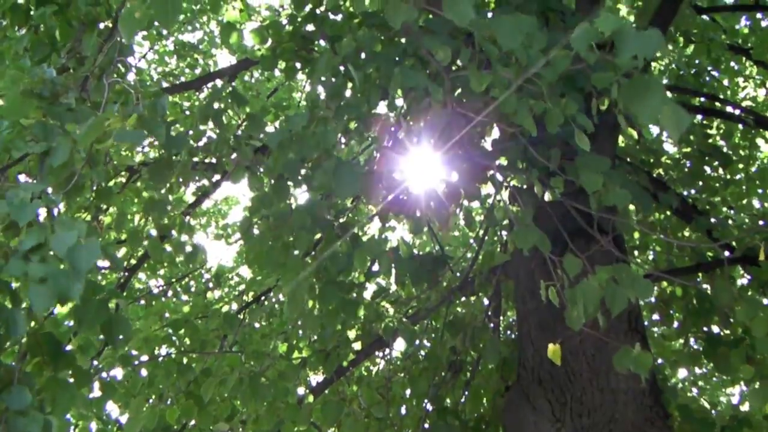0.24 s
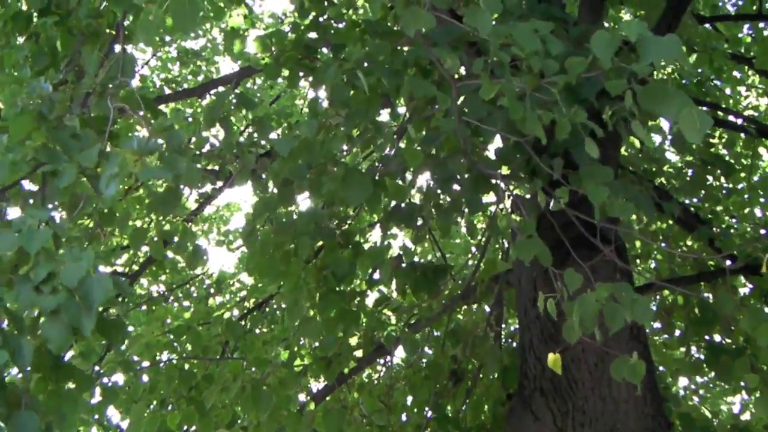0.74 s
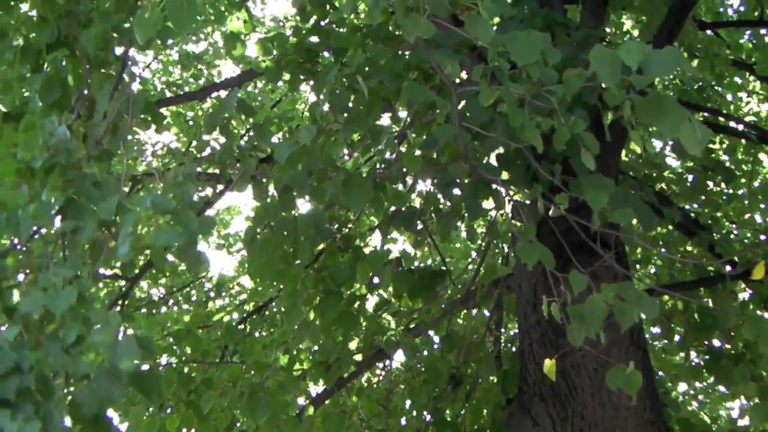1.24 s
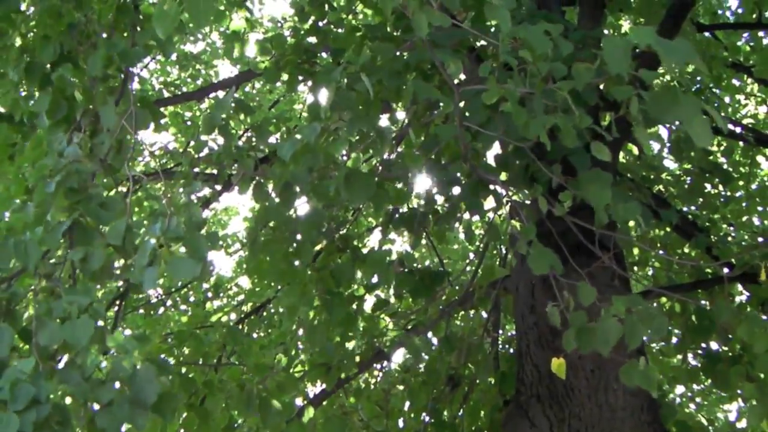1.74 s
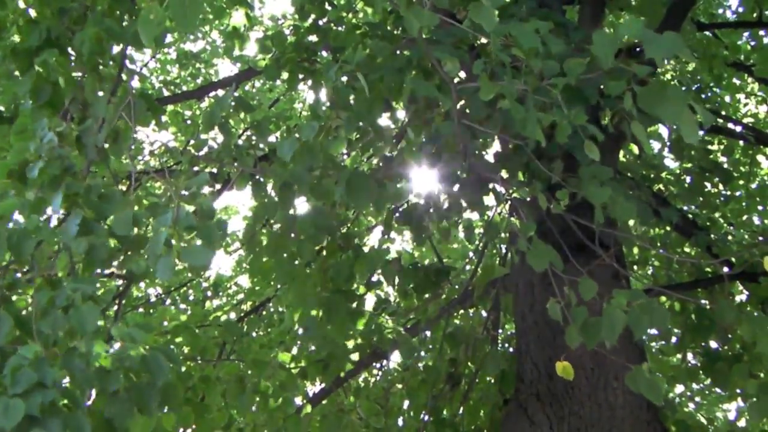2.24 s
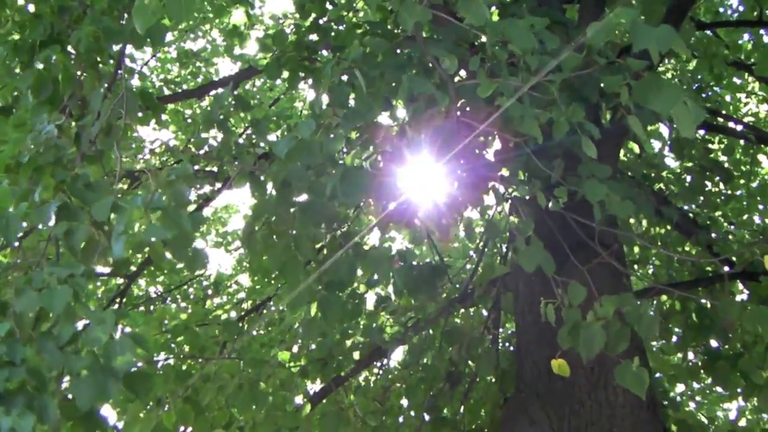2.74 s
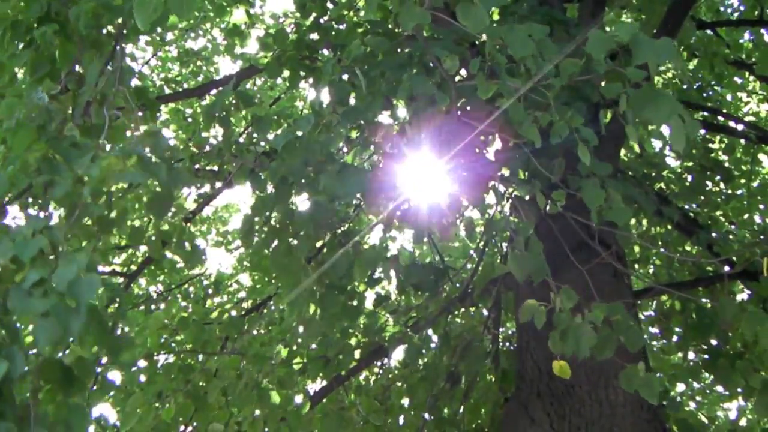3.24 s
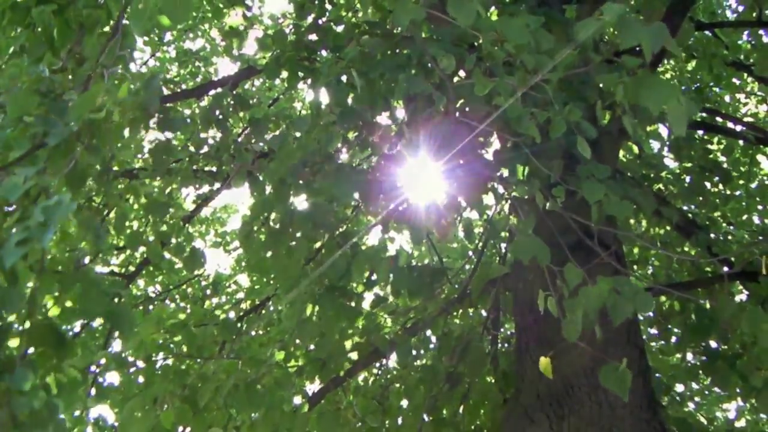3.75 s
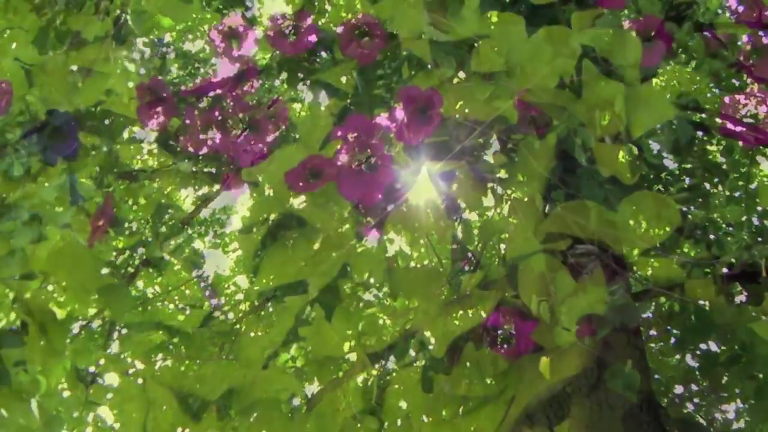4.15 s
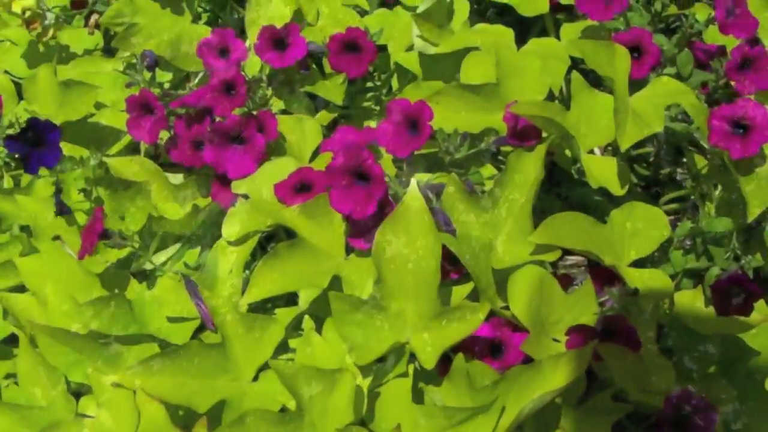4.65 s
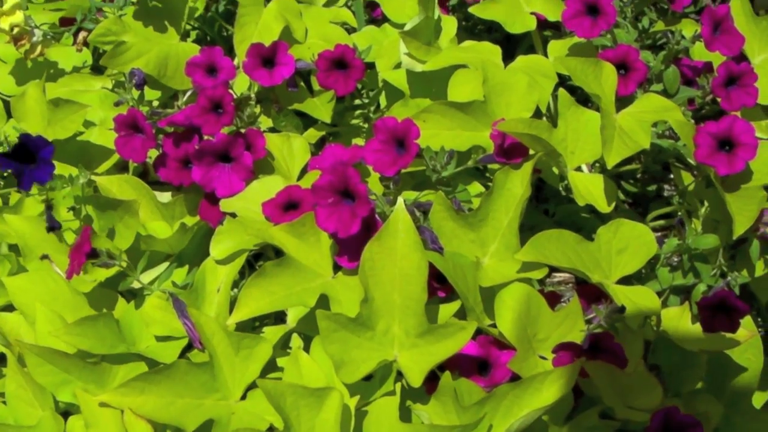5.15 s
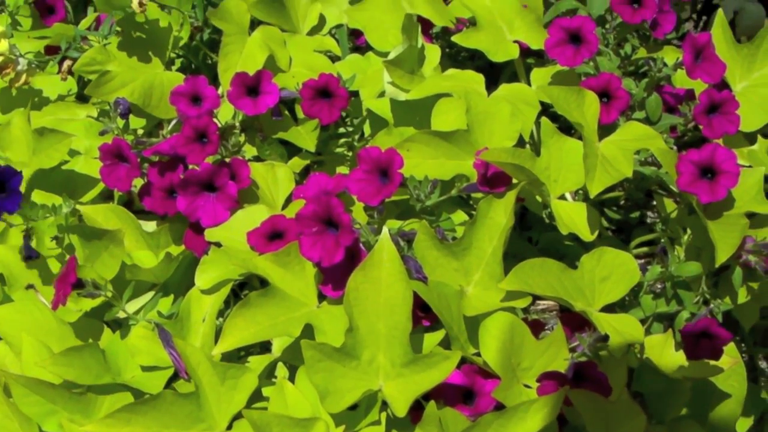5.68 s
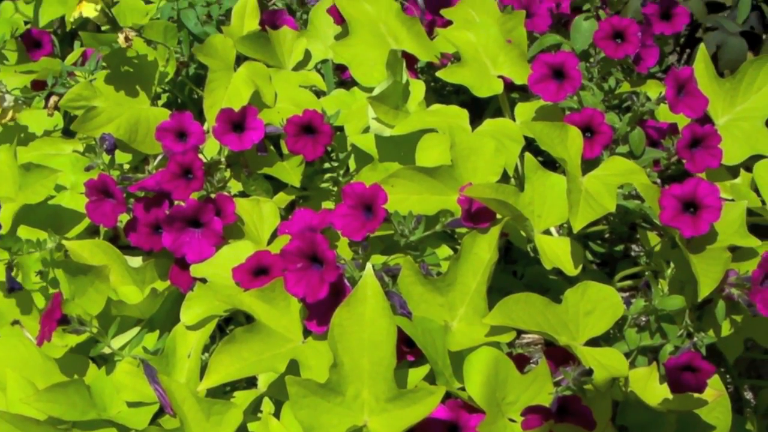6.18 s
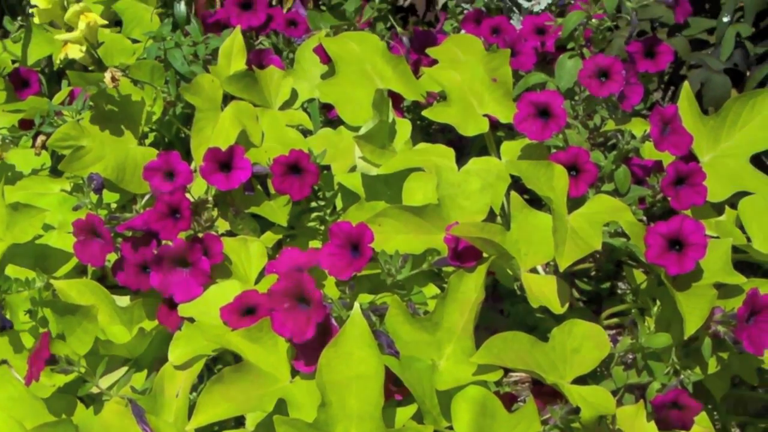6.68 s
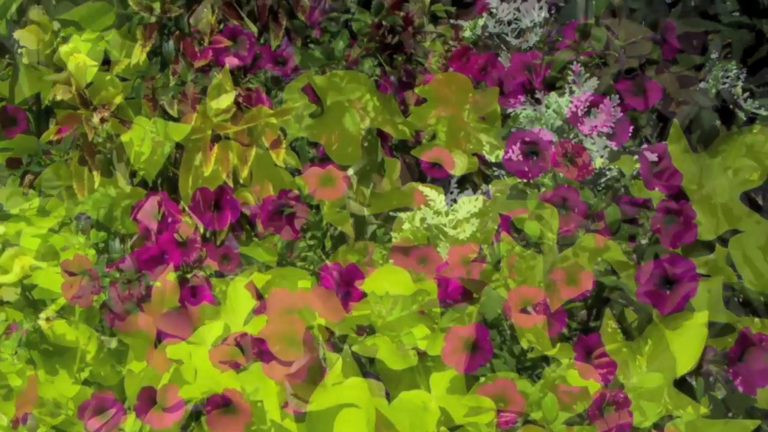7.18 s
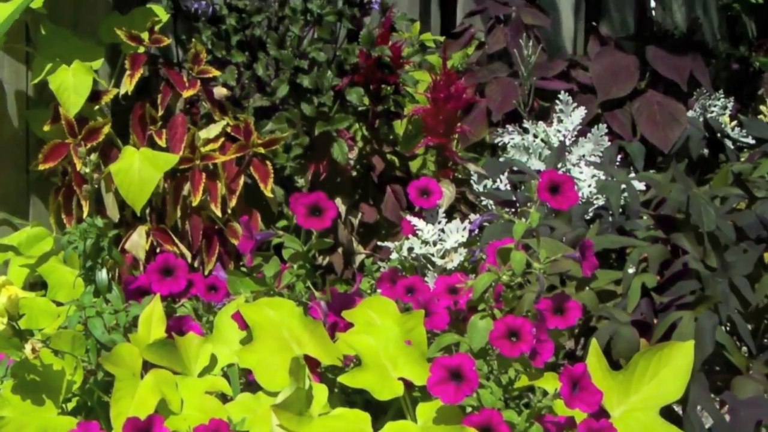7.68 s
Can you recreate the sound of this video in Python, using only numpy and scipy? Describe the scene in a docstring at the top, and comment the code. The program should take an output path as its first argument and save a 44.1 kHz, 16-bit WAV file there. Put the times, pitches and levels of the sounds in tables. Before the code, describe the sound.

A cicada sings a loud, harsh, rapidly pulsing buzz from a leafy tree, over faint distant traffic, with a bird twittering early on.

```python
"""Up in a leafy tree a cicada sings: about ten bursts a second, most of them a dozen pulls of its two tymbals
in turn. Every pull buckles four ribs, which click and set the tymbal ringing over its air sac.
The canopy answers with echoes and a short scattered tail, for the cicada and for a twittering bird.
Underneath lie a farther cicada (throbbing noise), distant traffic, rustling leaves and puffs of wind on
the microphone (coloured noise), and a faint hum (three wavering tones)."""
import sys
import numpy as np
from scipy import signal
from scipy.fft import rfft, irfft, next_fast_len
from scipy.io import wavfile
from scipy.ndimage import map_coordinates

SR = 44100
rng = np.random.default_rng(int(sys.argv[2]) if len(sys.argv) > 2 else 0)


def to_linear_factor(level_db):
    """Convert decibel levels (scalar or array-like) to linear amplitude factors."""
    exponent = np.asarray(level_db, float) / 20
    return 10 ** exponent


def wrap_up_sound(samples):
    """Save the sound to the file named by the first command line argument, as 16-bit audio."""
    columns = np.atleast_2d(samples).T
    # keep every value between -1 and 1, then stretch to whole-number steps
    tamed = np.clip(columns, -1, 1)
    steps = np.round(tamed * 32767).astype(np.int16)
    wavfile.write(sys.argv[1], SR, steps)


N = 349272  # length in samples


def unit(x):
    """Scales a sound to an rms of 1."""
    return x / np.sqrt(np.mean(x ** 2) + 1e-20)


def along(points, hz):
    """Reads (Hz, value) points at any frequency, along a log frequency axis."""
    f, v = np.transpose(points)
    return np.interp(np.log(hz + 1), np.log(f + 1), v)


def curves(rows):
    """Draws one value per sample for each column after the time."""
    s, *cols = np.transpose(rows)
    return [np.interp(np.arange(N) / SR, s, c) for c in cols]


def wobble(rate):
    """A smooth random curve with rate random points a second."""
    knots = rng.standard_normal(int(N * rate / SR) + 4)
    return map_coordinates(knots, [np.arange(N) * rate / SR])


def filtered(x, response):
    """Multiplies the spectrum of x by a response, which may be complex."""
    m = next_fast_len(x.shape[-1] + SR // 2)
    spectrum = rfft(x, m) * response(np.fft.rfftfreq(m, 1 / SR))
    return irfft(spectrum, m)[..., :x.shape[-1]]


def coloured(points, channels=1):
    """Noise of rms 1 whose spectrum follows (Hz, dB) points."""
    noise = rng.standard_normal((channels, N))
    return unit(filtered(noise, lambda hz: to_linear_factor(along(points, hz))))


def causal(points, size=1024):
    """A short sound with a given spectrum and its energy as early as possible (minimum phase)."""
    cepstrum = irfft(np.log(to_linear_factor(along(points, np.fft.rfftfreq(size, 1 / SR)))), size)
    # folding the second half onto the first leaves nothing before time zero
    cepstrum = cepstrum * np.r_[1, np.full(size // 2 - 1, 2), 1, np.zeros(size // 2 - 1)]
    return irfft(np.exp(rfft(cepstrum)), size)


def impulses(s, size, lead):
    """Band-limited impulses at times s, between samples if need be; the array starts lead samples early."""
    at = s * SR + lead
    taps = np.floor(at)[:, None] + np.arange(-7, 9)
    offset = taps - at[:, None]
    kernel = np.sinc(offset) * np.cos(offset * np.pi / 16) ** 2
    heights = (kernel * size[:, None]).ravel()
    return np.bincount(taps.astype(int).ravel(), heights, N + 2 * lead)[:N + lead]


def hum():
    """A low machine note that comes and goes: three tones locked to one slightly wavering pitch."""
    # loudness of the hum [t/s, level/dB]
    hum_level = [(0, -66), (1, -68.5), (2.8, -73), (3.6, -84), (4.4, -61.5), (4.6, -68), (5.2, -65),
                 (5.47, -53), (6.5, -59.5), (6.75, -64), (7.92, -55.5)]
    # its tones [multiple of the pitch, level/dB on top of the loudness]
    hum_tones = [(.5, 4.5), (1, 1), (3, -5.5)]
    pitch_hz, waver_hz = 226.5, 3.02
    turn = 2 * np.pi * np.cumsum(pitch_hz + waver_hz * wobble(2.5)) / SR
    strength_db = curves(hum_level)[0]
    return sum(to_linear_factor(strength_db + db + 1.0 * wobble(8.2)) * np.sin(k * turn) for k, db in hum_tones)


def traffic():
    """Distant traffic: a broad rumble of noise, nearly alike left and right."""
    # loudness of the traffic [t/s, level/dB before the lift below]
    traffic_level = [(0, -50.5), (3.4, -53), (4.3, -54.5), (4.75, -54), (4.82, -51), (6, -51.5),
                     (6.45, -49.5), (6.7, -50.5), (7.1, -51.5), (7.92, -49)]
    # its colour [f/Hz, relative level/dB]
    traffic_colour = [(20, -20), (60, 7), (110, 8.5), (200, -0.5), (280, -2), (400, 8), (600, -1),
                      (1000, 1.5), (1400, -1), (3000, -0.5), (9000, -6.5), (16000, -60)]
    mid, side = coloured(traffic_colour, channels=2)
    stereo = mid + 0.15 * side * np.array([[1], [-1]])
    return to_linear_factor(curves(traffic_level)[0] + 6.5 + 2.2 * wobble(4.34)) * stereo


def leaves():
    """A faint even rustle: bright noise, spread wider than the insects."""
    # colour of the rustle [f/Hz, relative level/dB]
    rustle_colour = [(2000, -13), (6000, 0), (10000, -11), (13000, -8), (15500, -12), (16000, -40)]
    mid, side = coloured(rustle_colour, channels=2)
    return to_linear_factor(-56.0 + .6 * wobble(2.6)) * (mid + 0.5 * side * np.array([[1], [-1]]))


def wind():
    """Air buffeting the two microphone ports separately: an unsteady breeze with short puffs on top."""
    # breeze [t/s, level/dB before the trim below]
    breeze = [(0, -65), (1.15, -63), (1.5, -68), (2.3, -53), (3.3, -68), (3.7, -60), (4.3, -57), (5.2, -55),
              (5.6, -64), (6.3, -46), (6.8, -64), (7.3, -48), (7.92, -61)]
    # puffs [t/s of the peak, level/dB before the trim, length/s between points 13 dB down]
    puff_list = [(1.983, -53, 0.077), (2.283, -41, 0.07), (2.36, -41, .08), (2.625, -32.5, 0.034),
                 (2.783, -43, .07), (3.134, -46, 0.082), (3.306, -53, 0.11), (3.392, -43.5, 0.19),
                 (4.036, -54, 0.089), (4.5, -50, 0.091), (4.888, -46, 0.098), (5.16, -49, .06),
                 (5.24, -54, 0.04), (5.647, -50, 0.055), (5.734, -40, 0.047), (6.262, -46, .12),
                 (6.373, -46, .06), (6.455, -48, .05), (6.58, -47, .09), (6.904, -45, 0.044),
                 (7.26, -38, 0.19), (7.434, -39, 0.1), (7.655, -38, 0.088)]
    # colour of the buffeting [f/Hz, relative level/dB]
    buffet_colour = [(20, -25), (50, -15), (110, 11), (200, -0.5), (400, -10), (800, -23), (2000, -100)]
    t = np.arange(N) / SR
    puffs = sum(to_linear_factor(db) * np.exp(-(2.44 * (t - s) / length) ** 2) for s, db, length in puff_list)
    strength = to_linear_factor(curves(breeze)[0] + 3.9 * wobble(13)) + puffs
    lumps = to_linear_factor(4.6 * np.array([wobble(15), wobble(21)]))  # one unsteadiness per port
    trim = to_linear_factor(-1.0)
    return trim * strength * unit(lumps * coloured(buffet_colour, channels=2))


def far_cicada():
    """A farther cicada, smeared to a buzz: noise that throbs unevenly."""
    # loudness of the buzz [t/s, level/dB before the lift below]
    far_level = [(0.0, -42.5), (7.92, -46.5)]
    # its colour [f/Hz, relative level/dB]
    far_colour = [(1000, -68), (2500, -15), (3400, 24.5), (4400, 12), (5300, -40), (6300, 15), (7200, -15),
                  (9000, 5), (12000, -49), (16000, -53)]
    throb = to_linear_factor(2.1 * wobble(200) + 0.72 * wobble(15))
    return to_linear_factor(curves(far_level)[0] + 7.5) * unit(throb * coloured(far_colour))


def bird():
    """A far bird's twitter: short sliding whistles with a fast warble in pitch."""
    # whistles [t/s, length/s, start f/Hz, end f/Hz, level/dB before the break-up below]
    whistles = [(.095, .04, 6400, 6200, -40), (.385, .045, 5350, 5250, -38), (.48, .04, 5900, 6700, -42),
                (.575, .025, 5100, 5400, -38), (.595, .025, 6800, 5800, -37), (.77, .04, 5250, 5350, -38),
                (.775, .03, 4600, 4400, -39), (.865, .035, 6500, 6700, -39), (.955, .04, 5700, 4900, -37),
                (1.055, .03, 4700, 4300, -40), (1.155, .04, 4200, 5600, -36),
                (1.245, .045, 5700, 6900, -36), (1.335, .045, 6300, 4900, -36),
                (1.43, .035, 4900, 4200, -38), (1.53, .02, 6500, 6000, -40), (1.555, .02, 5900, 5700, -41)]
    out = np.zeros(N)
    for s, length, start_hz, end_hz, db in whistles:
        u = np.arange(round(length * SR)) / (length * SR)  # 0 to 1 through the note
        warble_hz = 120 * np.sin(2 * np.pi * 130 * u * length)
        hz = start_hz + (end_hz - start_hz) * u + warble_hz
        tone = np.sin(2 * np.pi * np.cumsum(hz) / SR)
        out[round(s * SR):][:len(u)] += to_linear_factor(db) * np.sin(np.pi * u) ** .5 * tone
    return out * to_linear_factor(3 * wobble(150) + 1.5)  # leaves break the notes up


def pulls():
    """The cicada's muscles: time and level of every pull, and whether its tymbal faces away."""
    # bursts of song [t/s, number of pulls, basic first gap/ms, which tymbal leads: +1 or -1]
    bursts = [(-.0716, 13, 5, 1), (.0275, 14, 5.44, -1), (.1273, 13, 5.31, -1), (.2218, 14, 4.72, 1),
              (.3221, 14, 5.03, 1), (.423, 13, 4.77, 1), (.5188, 13, 5.5, -1), (.6152, 13, 4.59, 1),
              (.7105, 13, 5.27, -1), (.8066, 12, 4.91, 1), (.8986, 13, 4.77, 1), (.9951, 13, 5.41, -1),
              (1.0922, 13, 5.1, 1), (1.1888, 13, 5.77, -1), (1.2845, 12, 4.75, 1), (1.3761, 13, 4.73, 1),
              (1.4719, 13, 5.28, 1), (1.569, 13, 4.5, 1), (1.6647, 13, 5.77, -1), (1.761, 14, 5.29, 1),
              (1.8621, 13, 4.93, 1), (1.9605, 14, 5.84, -1), (2.0618, 13, 5.41, -1), (2.1588, 13, 5.16, 1),
              (2.256, 13, 5.84, -1), (2.3529, 13, 5.11, 1), (2.4504, 13, 5.84, -1), (2.5479, 12, 5.66, 1),
              (2.6434, 12, 5.18, 1), (2.7399, 13, 5.75, 1), (2.8367, 12, 5.64, -1), (2.9302, 13, 5.53, -1),
              (3.0282, 14, 5.01, 1), (3.13, 14, 4.87, 1), (3.2318, 12, 4.96, 1), (3.327, 12, 5.72, 1),
              (3.4196, 13, 5.54, 1), (3.5191, 13, 6.01, -1), (3.6185, 13, 5.41, 1), (3.7169, 13, 5.35, -1),
              (3.8164, 13, 5.54, 1), (3.9159, 12, 5.3, -1), (4.0127, 13, 6.21, -1), (4.1116, 13, 5.28, 1),
              (4.2106, 12, 6.22, -1), (4.3052, 12, 5.33, 1), (4.3997, 12, 5.92, -1), (4.497, 12, 6.84, -1),
              (4.5927, 12, 5.9, -1), (4.688, 12, 5.95, -1), (4.7824, 12, 6.17, -1), (4.8779, 12, 5.74, -1),
              (4.9727, 12, 6.37, -1), (5.0675, 12, 5.95, -1), (5.1615, 12, 5.94, -1),
              (5.2578, 12, 6.08, -1), (5.3527, 12, 5.79, -1), (5.447, 12, 6.37, -1), (5.5426, 12, 6.05, -1),
              (5.6376, 12, 5.9, 1), (5.7346, 12, 6.06, -1), (5.832, 12, 6.6, -1), (5.9278, 12, 5.97, -1),
              (6.0243, 11, 5.92, -1), (6.1167, 12, 5.81, 1), (6.2125, 12, 6.03, 1), (6.3099, 12, 5.93, 1),
              (6.405, 12, 6.28, 1), (6.5013, 12, 5.68, 1), (6.5963, 12, 5.79, 1), (6.6909, 12, 6.19, 1),
              (6.7874, 12, 5.48, -1), (6.8848, 11, 6.01, 1), (6.977, 10, 6.11, 1), (7.0651, 11, 6.73, -1),
              (7.1588, 11, 5.75, 1), (7.2516, 11, 6.43, -1), (7.3448, 11, 5.99, 1), (7.4352, 12, 5.91, -1),
              (7.531, 12, 6.98, -1), (7.6256, 11, 7.03, -1), (7.7166, 12, 5.68, 1), (7.8105, 12, 6.18, 1),
              (7.9062, 3, 5.42, 1)]
    # singing effort [t/s, level/dB]
    effort = [(0, -16), (.7, -15), (1.8, -15.5), (3.1, -15), (4.3, -15.5), (5.8, -15.5), (6.2, -16.5),
              (6.6, -15), (7.92, -15.4)]
    # gap between pulls, its growth per second as the muscles tire, unevenness of the two tymbals
    base_gap_ms, tiring_ms_per_s, lag_ms = 4.345, .019, .295
    # first pull, rise through the middle, last pull and its scatter, scatter from burst to burst
    first_db, swell_db, last_db, falter_db, burst_scatter_db = -1.5, 0.03, -2.5, 0.3, 0.45
    times, levels, away = [], [], []
    for s, count, first_ms, leader in bursts:
        k = np.arange(round(count) - 1)
        u = k / k[-1]  # 0 to 1 from the second pull to the last
        chance = rng.standard_normal((16, 3))[:len(k) + 1]
        hurry = 1.34 * u * (1 - u)  # ms; the pulls slow down through the burst
        gap_ms = base_gap_ms + tiring_ms_per_s * s
        later_ms = first_ms + k * gap_ms + leader * lag_ms * (k % 2) - hurry + .025 * chance[1:, 0]
        ms = np.r_[0, later_ms]
        swell = np.r_[first_db, -swell_db * (1 - u[:-1]), last_db + falter_db * chance[1, 2]]
        db = np.interp(s, *np.transpose(effort)) + burst_scatter_db * chance[0, 2]
        away.append(leader * (-1) ** np.arange(len(ms)) > 0)  # the tymbals take turns
        times.append(s + ms / 1000)
        levels.append(db + swell + .5 * chance[:, 1])
    return np.concatenate(times), np.concatenate(levels), np.concatenate(away)


def cicada(lead):
    """Each rib snaps with a bright click and leaves the tymbal ringing; the air sac radiates the ring."""
    # ribs of one pull [mean time after the pull/ms, scatter/ms]
    rib_times = [(0, .035), (.6, .025), (1.09, .008), (1.61, .035)]
    # what each rib gives, before the mix below [click level/dB, ring f/Hz, ring level/dB, ring fade/(dB/ms)]
    rib_sounds = [(4, 3100, -47, 20), (-3.5, 3040, -2, 27), (2.5, 3259, -1, 2), (0, 5000, -26, -0.5)]
    # colour of a click [f/Hz, level/dB]
    click_colour = [(300, -95.5), (1250, -16.5), (1700, -11.5), (2400, 7.5), (3000, 1), (3700, -3),
                    (4500, 4), (5500, -1.5), (6500, -0.5), (8500, -7), (10000, -16), (12000, -30),
                    (14000, -41), (16000, -42)]
    # air sac, a broad resonance passed twice [f/Hz, width/Hz, level/dB of one pass]
    air_sac = [(3040, 3520, 1.5)]
    far_tymbal_db = -2  # the body shades the clicks of the tymbal that faces away
    s, db, away = pulls()
    ms, scatter = np.transpose(rib_times)
    click_db, hz, ring_db, fade = np.transpose(rib_sounds)
    chance = rng.standard_normal((len(s), len(rib_sounds), 4))
    at = s[:, None] + (ms + scatter * chance[..., 0]) / 1000

    click_level = (db + far_tymbal_db * away)[:, None] + click_db + chance[..., 1]
    clicks = impulses(at.ravel(), to_linear_factor(click_level).ravel(), lead)
    snap = signal.fftconvolve(clicks, causal(click_colour))[:len(clicks)]

    first = np.ceil(at * SR)[..., None] + np.arange(320)  # the samples of each ring
    t = (first / SR - at[..., None]) * 1000  # ms since the snap
    pitch = (hz * (1 + .006 * chance[..., 3]))[..., None] / 1000  # cycles per ms, once settled
    cycles = pitch * (t + .14 * .3 * (1 - np.exp(-t / .3)))  # starts 14 % sharp and settles
    start_db = (db[:, None] + ring_db + .6 * chance[..., 2])[..., None]
    ring_level = start_db - fade[:, None] * t - 1.3 * t ** 2  # damped harder as the plate relaxes
    ring = to_linear_factor(ring_level) * np.sin(2 * np.pi * cycles)
    ring = np.bincount((first + lead).astype(int).ravel(), ring.ravel(), N + 2 * lead)[:N + lead]

    def sac_response(f):
        return sum(to_linear_factor(g) * 1j * f * w / (c * c - f * f + 1j * f * w) for c, w, g in air_sac) ** 2

    # minus: the plate jumps inward, then swings back
    return to_linear_factor(5) * filtered(ring, sac_response) - to_linear_factor(14.5) * snap


def canopy(x):
    """Limbs and twigs send single echoes; the leaves scatter a tail that shifts as they move."""
    # limbs and trunks [delay/ms, level/dB]
    limb_echoes = [(4.1, -75), (9.3, -29), (14, -27), (23, -26)]
    # thin twigs, which return only treble [delay/ms, level/dB before the treble filter]
    twig_echoes = [(1.7, -37), (2.3, -11), (3.1, -16.5), (3.7, -31)]
    # how long the leaf tail takes to fall by 60 dB [f/Hz, time/s]
    tail_times = [(1500, 0.25), (3300, 0.23), (6000, 0.26), (10000, 0.16)]
    limbs = sum(to_linear_factor(db) * np.roll(x, round(ms * SR / 1000)) for ms, db in limb_echoes)
    twigs = sum(to_linear_factor(db) * np.roll(x, round(ms * SR / 1000)) for ms, db in twig_echoes)
    twigs = filtered(twigs, lambda f: (1j * f / (1j * f + 6000)) ** 3)
    hop = SR // 10  # a new random tail every tenth of a second, cross-faded
    fade = np.sqrt(signal.get_window("hann", 2 * hop))
    leaf_tail = np.zeros(len(x) + SR)
    for i in range(0, len(x), hop):
        hz, t, z = signal.stft(rng.standard_normal(SR // 2), SR, nperseg=256)
        decay = to_linear_factor(-60 * t / along(tail_times, hz)[:, None])
        tail = signal.istft(z * decay, SR, nperseg=256)[1][:SR // 2]
        piece = x[i:i + 2 * hop]
        part = signal.fftconvolve(piece * fade[:len(piece)], tail / np.linalg.norm(tail))
        leaf_tail[i:i + len(part)] += part
    return limbs + twigs + to_linear_factor(-9.5) * leaf_tail[:len(x)]


def scene():
    """Adds all sources; both cicadas and the bird stand in the middle."""
    lead = SR // 4  # the song starts early, so its echoes are already there at time zero
    song = cicada(lead) + np.pad(bird(), (lead, 0))
    near, wet = song[lead:], canopy(song)[lead:]
    # the treble of the canopy's answer differs left to right
    spread = to_linear_factor(-32) * np.diff(np.roll(wet, 300), prepend=0) * np.array([[1], [-1]])
    background = far_cicada() + traffic() + leaves() + hum() + wind()
    return near + wet + spread + background


def top_cut(x):
    """Nothing passes above the cut-off."""
    return signal.sosfilt(signal.butter(12, 16460, fs=SR, output="sos"), x)


def record(dry):
    """Cuts everything above about 15.75 kHz with a very steep filter."""
    limited = filtered(dry, lambda hz: 1 / (1 + (hz / 15750) ** 90))
    return top_cut(limited)


dry = scene()
out = record(dry)
wrap_up_sound(out)
```